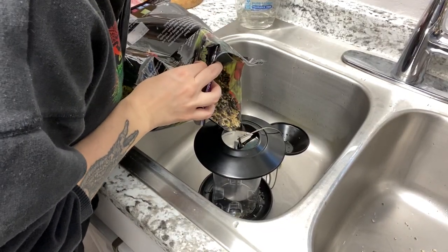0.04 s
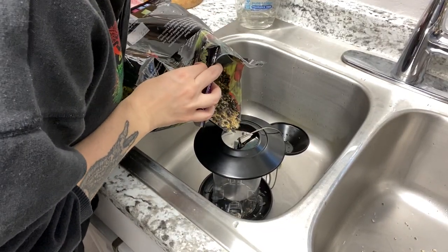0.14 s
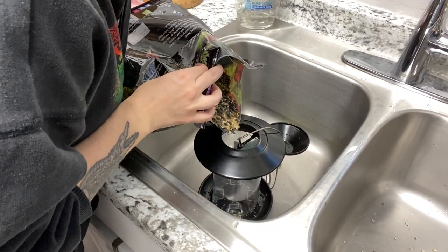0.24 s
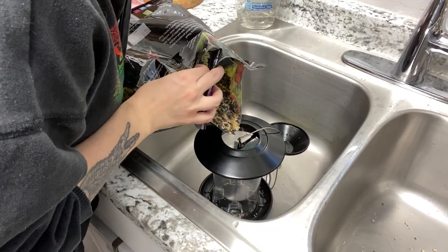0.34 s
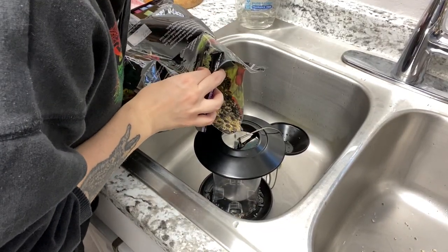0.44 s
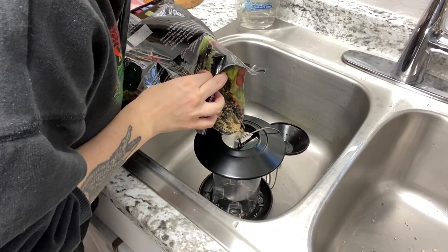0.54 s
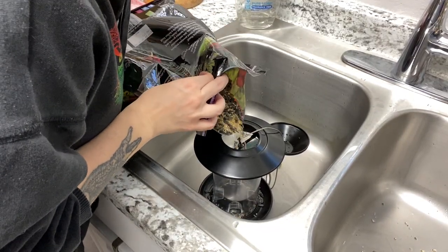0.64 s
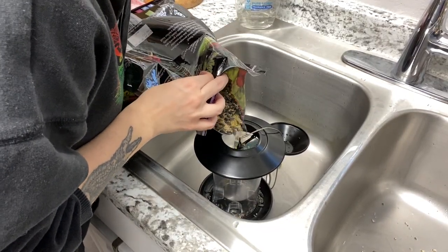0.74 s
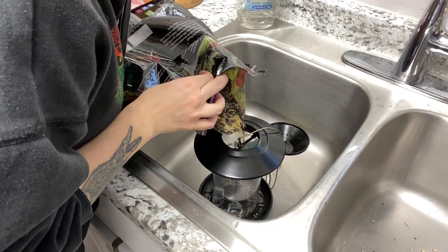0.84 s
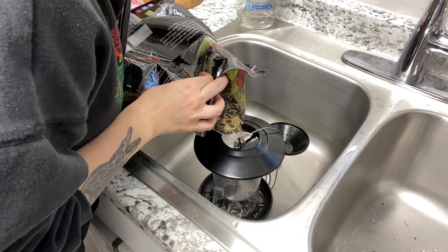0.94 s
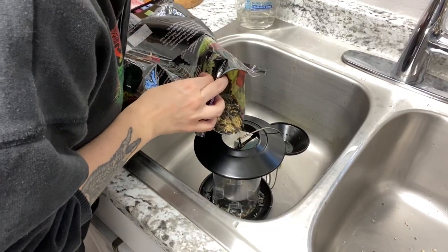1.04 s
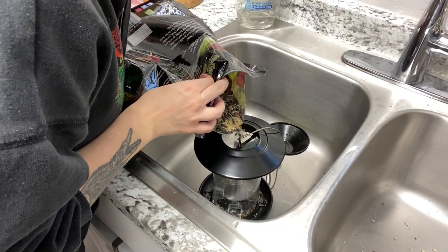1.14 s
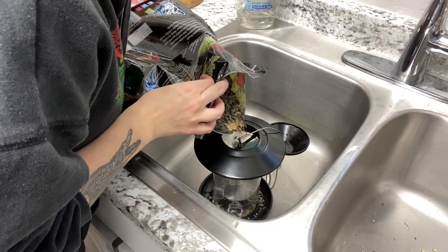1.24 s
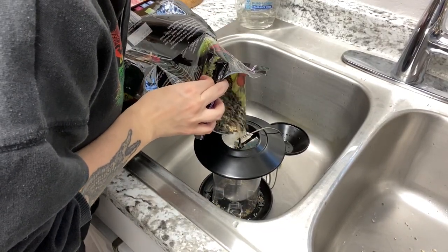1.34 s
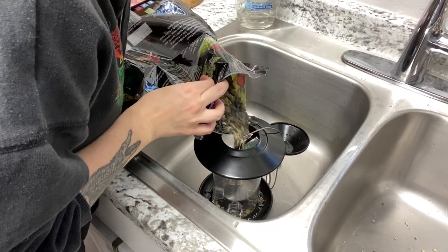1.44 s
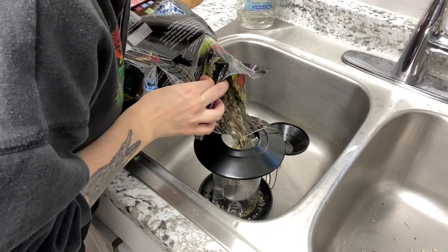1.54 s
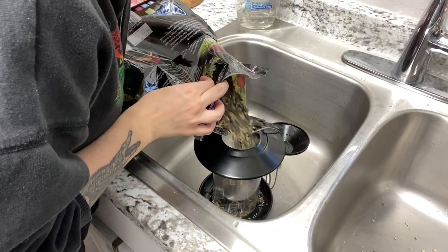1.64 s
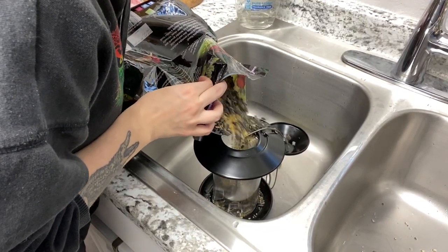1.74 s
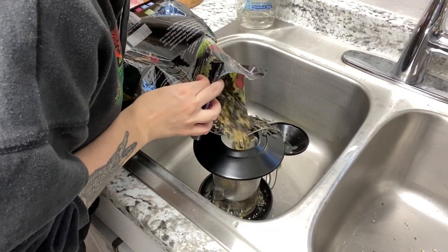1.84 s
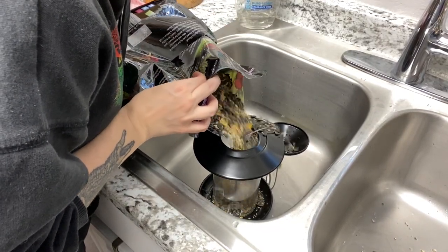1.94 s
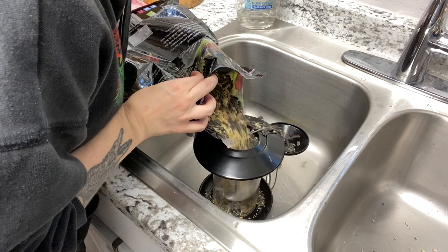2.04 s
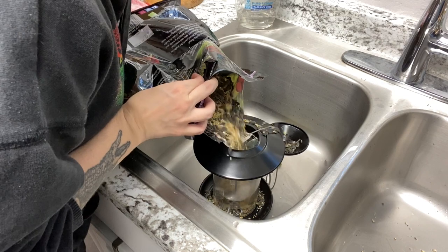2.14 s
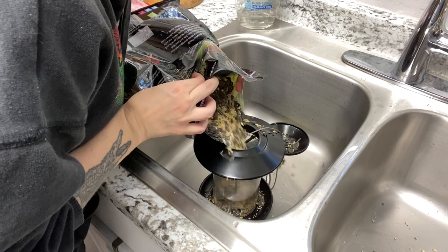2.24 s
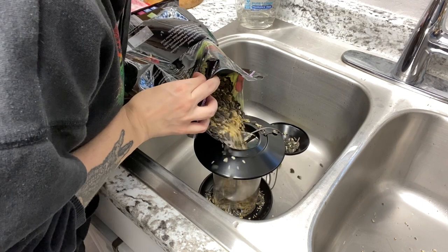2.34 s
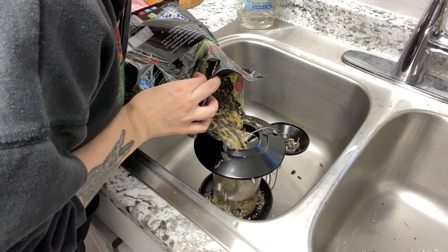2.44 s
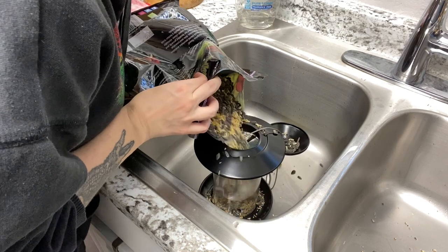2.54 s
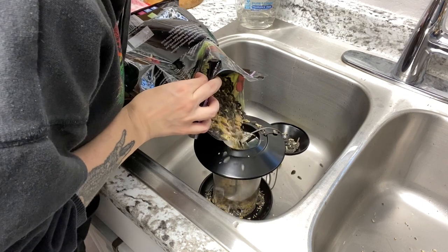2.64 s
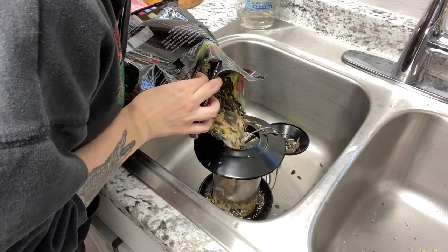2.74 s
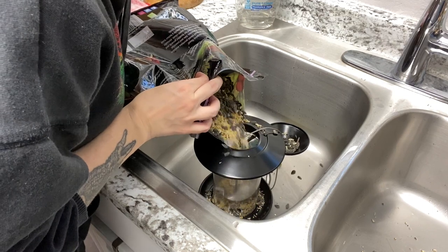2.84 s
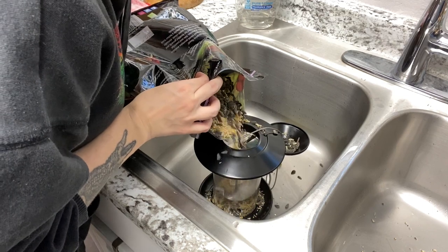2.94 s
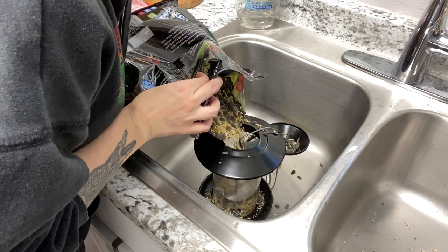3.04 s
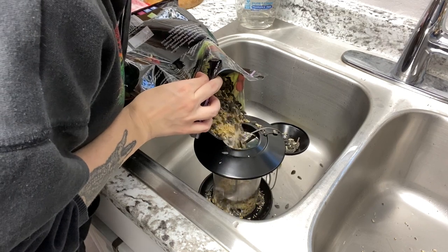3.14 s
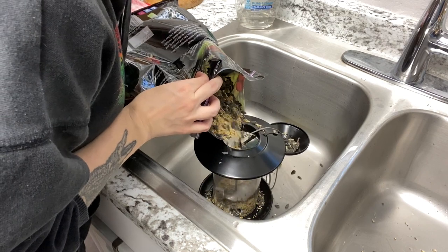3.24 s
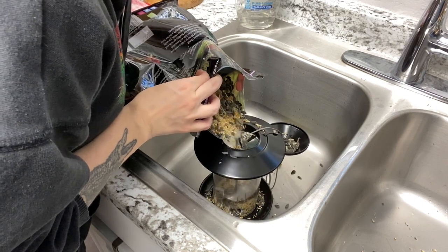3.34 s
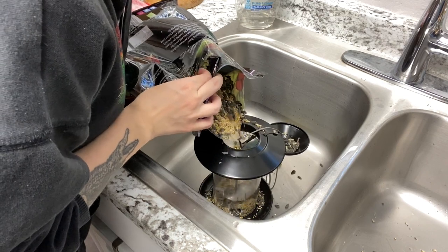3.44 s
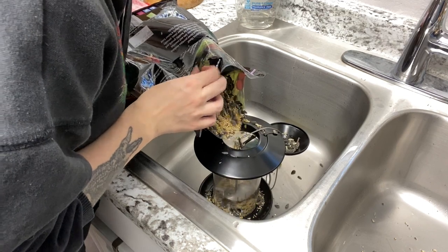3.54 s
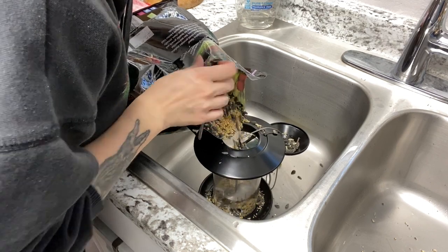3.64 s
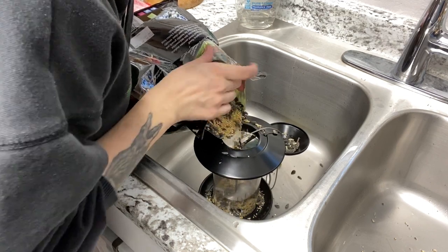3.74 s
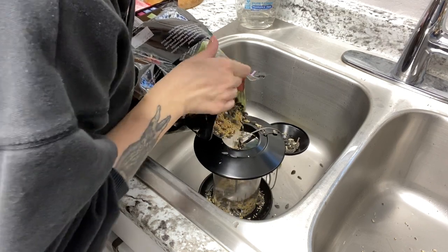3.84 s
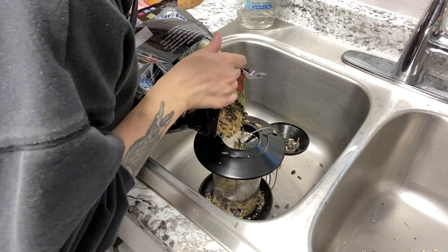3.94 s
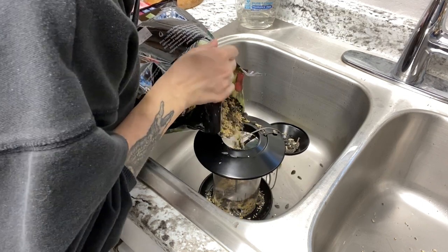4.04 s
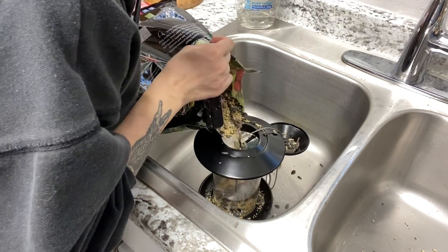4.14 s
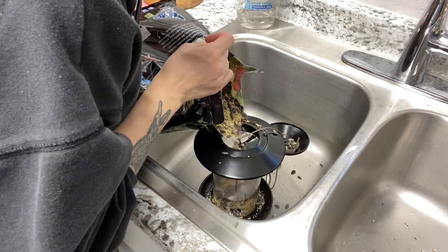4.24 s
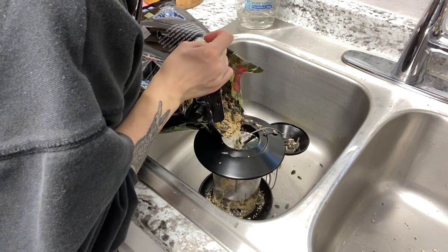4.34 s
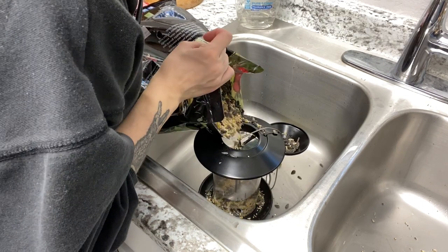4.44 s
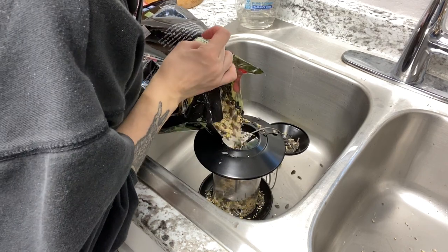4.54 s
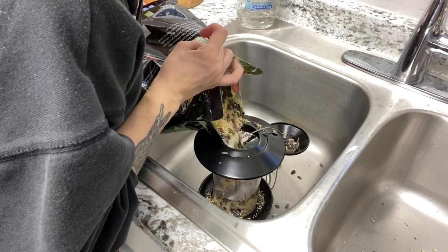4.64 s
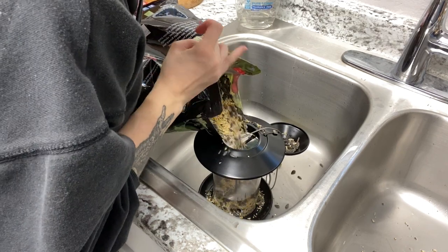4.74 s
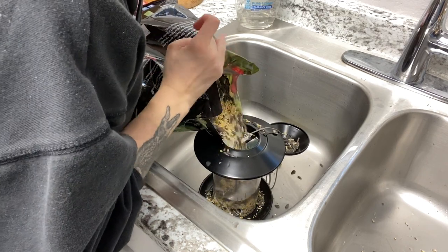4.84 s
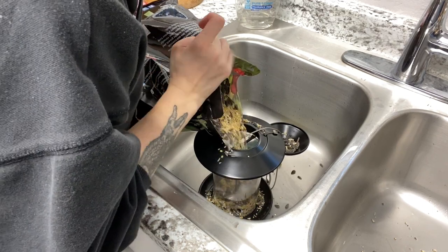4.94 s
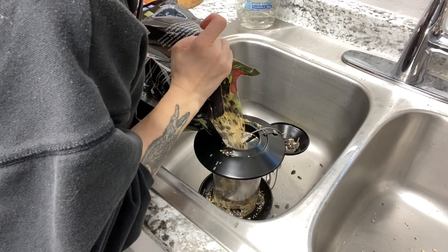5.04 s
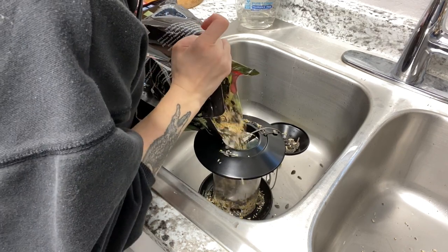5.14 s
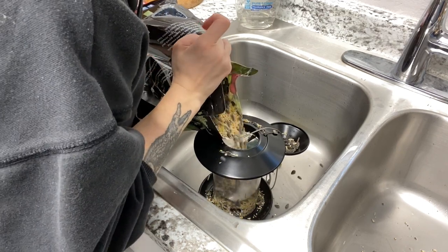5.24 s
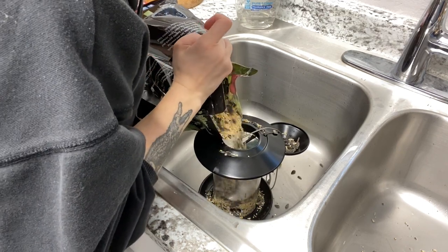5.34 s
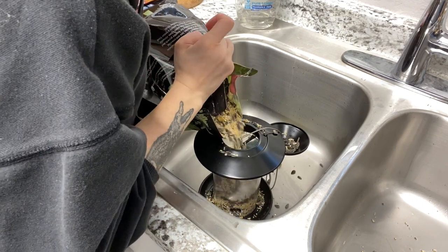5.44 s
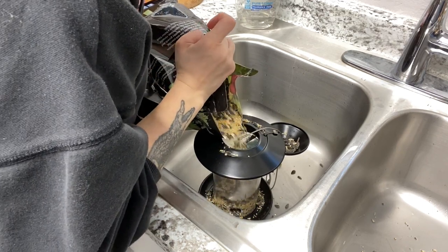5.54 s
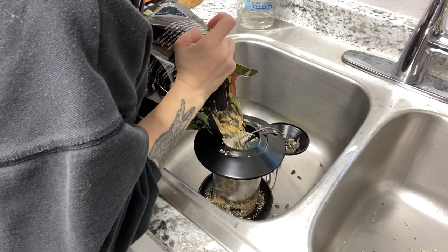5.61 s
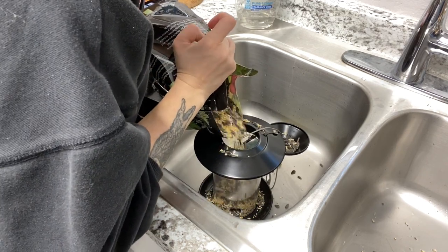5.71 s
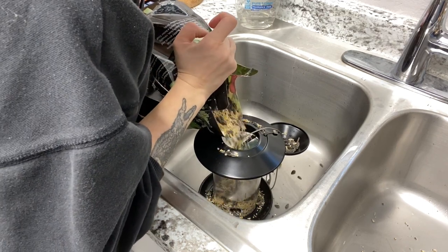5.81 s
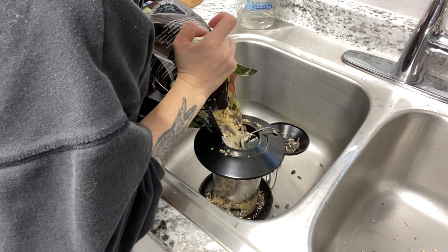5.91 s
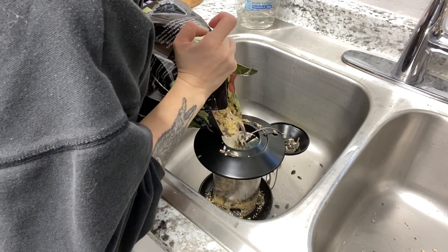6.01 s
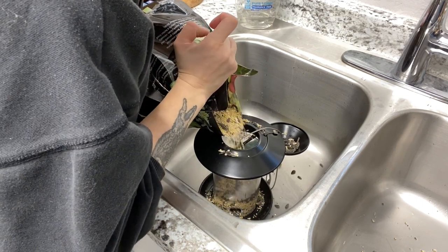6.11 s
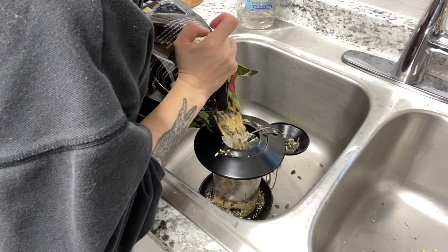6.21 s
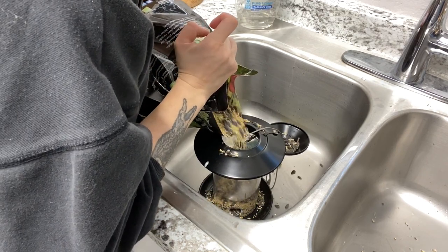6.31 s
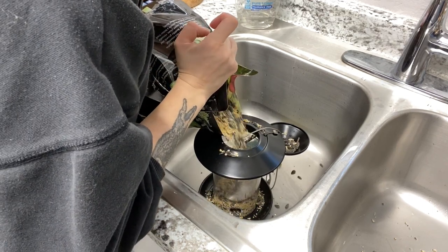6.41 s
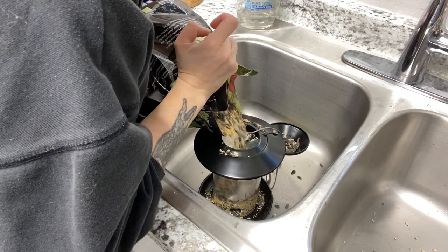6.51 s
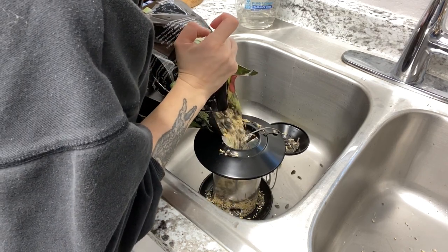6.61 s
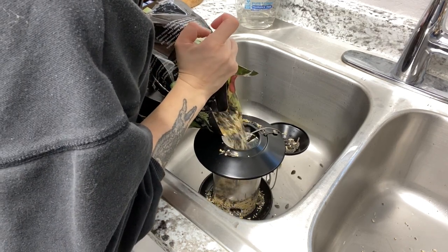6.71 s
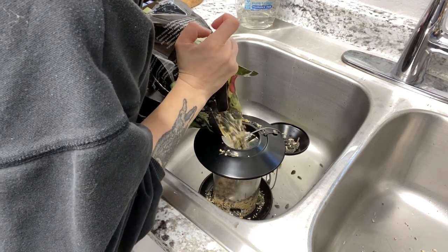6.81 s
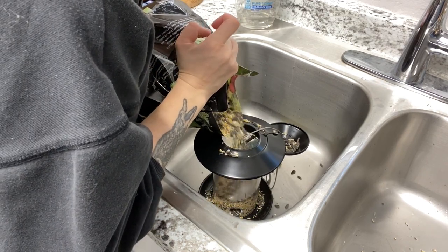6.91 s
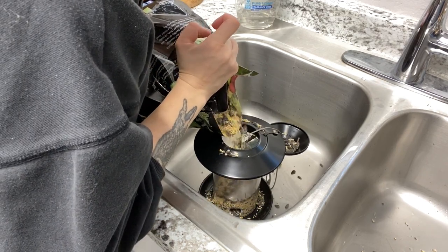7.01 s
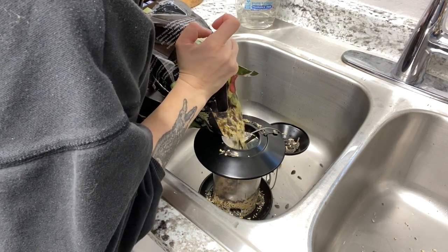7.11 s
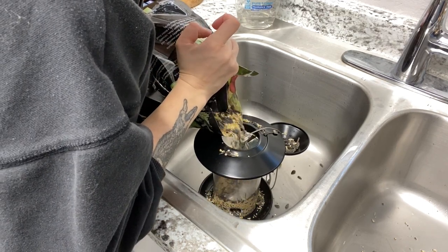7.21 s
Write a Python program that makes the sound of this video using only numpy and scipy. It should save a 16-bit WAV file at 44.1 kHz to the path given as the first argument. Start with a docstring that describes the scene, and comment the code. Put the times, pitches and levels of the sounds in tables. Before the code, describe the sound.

Close stereo pickup at a kitchen sink: bird seed trickles, nearly pauses, then rushes from a plastic bag into a tube feeder. Grains hiss and tick, the metal roof rings, and strays ping on steel. The patter thins and dulls as the tube fills; the bag thumps and crackles in the hands around four seconds, then a softer pour resumes. Faint traffic hums beyond the walls.

```python
"""Seed poured into a tube feeder

Bird seed pours from a plastic bag into a tube feeder that stands in a steel sink. Dense random impacts form
the bright patter, excite the modes of the metal roof and blow the air column of the tube into a tone.
Heavy seeds tick singly, strays ring and the bag thumps in the hands: noise bursts, decaying tones and hollows.
Traffic drones beyond the walls as tones and shaped noise; two microphone ports hear it with a phase offset."""
import sys
import numpy as np
from scipy import signal
from scipy.fft import rfft, irfft, next_fast_len
from scipy.io import wavfile

SR = 44100
rng = np.random.default_rng(int(sys.argv[2]) if len(sys.argv) > 2 else 0)


def to_wav(sig):
    """Store sig (one row per channel, or 1-D mono) as 16-bit WAV at the path in sys.argv[1].

    Samples outside -1..1 are clipped; the rate is SR.
    """
    pcm = np.clip(np.atleast_2d(sig), -1, 1) * 32767
    pcm = np.round(pcm).astype(np.int16)
    wavfile.write(sys.argv[1], SR, pcm.T)  # frames by channels


N = 320607
PADDED = next_fast_len(N + 4000)   # FFT length in samples
TIME_S = np.arange(N) / SR

# Heavy seeds landing. Each row: start in seconds, relative level of the bright burst in dB,
# middle part against the bright level in dB, knock on the roof against the bright level in dB.
HEAVY_SEEDS = [(0.0179, -12.5, -26, -36), (0.064, -23, -19, 1), (0.122, -12, -4, -31),
               (0.195, -20, -20, -34), (0.25, -15.5, -12, -34), (0.308, -11.5, -16.5, -20),
               (0.3281, -31, -12, -6), (0.38, -22.5, -11, -26), (0.446, -29.5, 1, -21),
               (0.467, -21, -13, -13.5), (0.501, -28, 1, -13), (0.602, -26, -3.5, -12),
               (0.6862, -13, -17, -42), (0.698, -10, -28, -25), (0.7516, -17, -20, -32),
               (0.787, -10.5, -12, -38), (0.84, -15, -5, -29), (0.884, -11, -8, -38),
               (0.934, -18.5, -16, -25), (0.968, -14, -11, -26), (1.0545, -11, -13.5, -29),
               (1.1233, -11, -26, -20.5), (1.1496, -13.5, -7, -15.5), (1.1754, -12.5, -24, -26),
               (1.258, -16.5, -9, -34), (1.3263, -17, -15, -24), (1.371, -17, -7, -10.5),
               (1.3902, -19, -8, -18), (1.4082, -19, -11, -4), (1.4496, -18, -5, -14),
               (1.471, -18, -8, -26), (1.5151, -18, -2, -8), (1.6227, -9, -26, -17), (1.674, -11, -27, -26),
               (1.7375, -14, -18, -31), (1.82, -28, -6, -14), (1.8725, -13, -13, -20),
               (1.922, -23, -18, -6), (2.026, -13, -25, -33), (2.0603, -17, -25, -36),
               (2.137, -13, -8, -25), (2.1815, -18, -25, -5), (2.373, -21, -7, -12), (2.4628, -34, 10, -25),
               (2.4954, -17, -13, -15.5), (2.5242, -15, -12, -35), (2.5443, -20, -4, -11),
               (2.6098, -23, -16, -33), (2.707, -24, -7, -34), (2.8197, -44, -3, -25),
               (2.9224, -23, -7.5, -33), (2.9472, -19, -14, -16), (2.9828, -22, -7, -13),
               (3.0898, -27, -8, -21), (3.142, -24, -12, -8), (3.19, -21, -10, -36),
               (3.236, -19.5, -11, -36), (3.268, -33, 0, -32), (3.4099, -43, 0, -25), (3.439, -24, -6, -12),
               (3.474, -29, -2, -8), (3.5008, -21, -12, -15), (3.5832, -19.5, -25, -15.5),
               (3.6126, -19.5, -7.5, -33), (3.683, -10.5, -12, -23), (3.7736, -27, -1, -20),
               (3.8272, -22.5, -12, -18), (3.8479, -28, 5, -1), (3.899, -26, -10, -17),
               (3.923, -22.5, -7, -12), (4.047, -22, -11, -6.5), (4.1591, -17.5, -12, -9),
               (4.2712, -24, -4.5, -19), (4.31, -11, -10, -15), (4.345, -16.5, -17, -14),
               (4.385, -24, -3, -20), (4.4528, -13.5, -17, 2), (4.461, -20, -10, -3), (4.511, -21, -4, -20),
               (4.66, -19.5, -11, -35), (4.699, -25, -10, -30), (4.766, -27, -5, -30),
               (4.9872, -19, -9, -5), (5.0665, -12.5, -14, -37), (5.09, -18, -8, -18),
               (5.126, -31, -2, -25), (5.144, -23, -7, -24), (5.2612, -20, -9, -26), (5.3074, -23, -7, -19),
               (5.4347, -23.5, -9, -24), (5.463, -39, -6, -25), (5.5057, -20.5, -15, -30),
               (5.5782, -36, -0.5, -25), (5.65, -23.5, -9, -24), (5.675, -25, -7, -27),
               (5.724, -35.5, 9, -25), (5.7896, -29, -7, -27), (5.8154, -29, -5, -27),
               (5.8381, -50, -7, -27), (5.886, -36, -15, -33), (5.918, -36, -17, -25),
               (5.954, -30, -7, -27), (6.0204, -32.5, 0, -27), (6.04, -24, -6.5, -27),
               (6.116, -19.5, -17, -20), (6.129, -27, -16, -1), (6.143, -28, -9, -27),
               (6.179, -30, -6, -27), (6.2093, -20, -18, -8), (6.248, -23, -12, -4), (6.293, -23, -9, -41),
               (6.364, -19, -10, -29), (6.4043, -32, -17, -27), (6.433, -25, -11, -27),
               (6.4585, -23, -14, -29), (6.496, -19, -11, -28), (6.5233, -18, -10, -29),
               (6.565, -20, -21, -27), (6.624, -16.5, -14, -30), (6.682, -14.5, -19, -8.5),
               (6.727, -21, -4, -23), (6.8056, -33.5, 7, -19), (6.8503, -30, 0, -27),
               (7.2555, -29, -9, -27)]
# The bag buckling in the hands. Each row: start in seconds, relative level in dB, pitch of the fold in Hz,
# snap against that level in dB, rise in seconds.
BUCKLES = [(0.008, -40, 820, -9, 0.0014), (0.179, -36.5, 412, -13, 0.0016), (0.394, -28, 353, -20, 0.0026),
           (0.687, -39, 373, -9, 0.0016), (1.052, -37.5, 395, -6.5, 0.00096),
           (1.346, -33.5, 382, -13, 0.0017), (2.21, -34.5, 590, -13, 0.0019),
           (2.219, -36.5, 333, -7.5, 0.003), (3.789, -24.5, 480, -10, 0.00095),
           (3.932, -31, 760, -13, 0.0022), (3.962, -29, 590, -3, 0.00078), (4.073, -33, 430, -11, 0.0046),
           (4.121, -38, 560, -26, 0.016), (4.139, -39, 330, -22, 0.004), (4.164, -40, 470, -8, 0.007),
           (4.177, -40, 590, -12, .004), (4.188, -42, 520, -8, 0.0048), (4.222, -40, 695, -6, 0.0042),
           (4.234, -42, 990, -7, 0.004), (4.286, -36.5, 790, -12, 0.0022), (4.296, -34, 850, -9, 0.0017),
           (4.337, -24.5, 443, 3, 0.00052), (4.346, -20.5, 398, -2, 0.0016), (4.364, -33, 330, -18, 0.0047),
           (4.391, -34.5, 363, -0.5, 0.0047), (4.421, -32.5, 725, -4, 0.0021), (4.446, -32, 363, 7, 0.0088),
           (4.463, -35, 420, 1, .003), (4.488, -42, 324, 3, 0.0055), (4.51, -52, 495, -1, 0.0044),
           (4.629, -30, 795, -9, 0.00036), (4.719, -35, 910, -6, .002), (4.728, -20.5, 840, -6, 0.0013),
           (4.83, -40, 584, -1, 0.0025), (4.898, -42.5, 304, 5, 0.00077), (5.174, -38.5, 593, -13, 0.0037),
           (5.213, -39.5, 322, -2, 0.0048), (5.224, -44, 520, 7.5, 0.0068), (5.326, -28, 560, -5, 0.0015),
           (5.492, -45, 890, -6, 0.0018), (5.724, -30, 1530, -6.5, 0.0014), (5.731, -37, 600, -15, .001),
           (6.199, -47, 506, 9, 0.0059)]
# Colour of a seed impact. Each row: frequency in Hz, relative spectral level in dB.
SEED_COLOUR = [(400, -30), (1200, -18), (2200, -11), (2850, -14), (3300, -8.5), (4000, -6), (5200, -5),
               (6200, 0), (7000, -4), (8000, -3), (9500, -2.5), (12000, -2.5), (13500, -7), (15700, -5)]


def amp(db):
    """Decibels to gain: twenty decibels are a factor of ten in amplitude."""
    return 10 ** (np.asarray(db) / 20)


def rms_one(x):
    """Normalisation of a signal to unit root mean square."""
    return x / np.sqrt(np.mean(x ** 2) + 1e-20)


def in_time(rows):
    """Linear interpolation of a table's columns over time, one value a sample."""
    s, *columns = np.transpose(rows)
    return [np.interp(TIME_S, s, c) for c in columns]


def in_hz(rows):
    """Interpolation of a table's columns over log frequency, one value an FFT bin."""
    hz, *columns = np.transpose(rows)
    grid = np.log(np.arange(PADDED // 2 + 1) * SR / PADDED + 1)
    return [np.interp(grid, np.log(hz), c) for c in columns]


def coloured(x, spectrum):
    """Linear filtering: the spectrum is multiplied by the gain curve of a table."""
    return irfft(rfft(x, PADDED) * amp(in_hz(spectrum)[0]), PADDED)[..., :N]


def drift(rate_hz):
    """Slow random fluctuation of unit rms: noise through a double-pole low-pass, computed at every 40th sample."""
    r = np.exp(-2 * np.pi * rate_hz * 40 / SR)
    noise = rng.standard_normal(N // 40 + 2002)
    slow = signal.lfilter([1], [1, -2 * r, r * r], noise)[2000:]   # the settling is dropped
    return np.interp(np.arange(N) / 40, np.arange(len(slow)), rms_one(slow))


def resonate(x, hz, width_hz):
    """Damped resonance: one pole pair whose bandwidth sets the decay, with gain near 1 at the peak."""
    r = np.exp(-np.pi * width_hz / SR)
    poles = [1, -2 * r * np.cos(2 * np.pi * hz / SR), r * r]
    return signal.lfilter([(1 - r * r) / 2, 0, (r * r - 1) / 2], poles, x)


def narrow(white, hz, width_hz):
    """Narrow-band noise: two equal resonances in series make a wavering tone of unit rms."""
    return rms_one(resonate(resonate(white, hz, width_hz), hz, width_hz))


def scatter(per_s, size_db, t60):
    """Shot noise: random impacts die exponentially in power round the basin; two paths of unrelated noise."""
    hits = rng.random(N) < per_s / SR
    power = hits * amp(2 * size_db * np.minimum(rng.exponential(1, N), 4))
    r = amp(-120 / (t60 * SR))
    envelope = np.sqrt(signal.lfilter([1], [1, -r], power + 1e-18))
    return envelope * rng.standard_normal((2, N))


def silence():
    """Two almost empty paths: a trace of noise avoids denormal numbers, so that filters stay fast."""
    return 1e-12 * rng.standard_normal((2, N))


def add(out, s, burst):
    """Superposition of a burst that starts at time s."""
    i = round(s * SR)
    out[:, i:i + burst.shape[1]] += burst[:, :N - i]


def patter(flow_db):
    """Superposed seed impacts: clumped fine grains, crisp small ticks, sparser large ones and resonant pings."""
    dull_hz, dull_db_per_s, patchy_db = 8900, 0.5, 1.5
    fine = rms_one(scatter(2000 * amp(3 * drift(18)), size_db=3, t60=0.025))
    crisp = rms_one(scatter(300 * amp(3 * drift(7.3)), size_db=2.8, t60=0.03))
    large = rms_one(scatter(110, size_db=-9, t60=0.12))
    ringing = rms_one(pings(700, quality=60))
    seeds = fine + amp(-1) * crisp + amp(-5) * large + amp(-5) * ringing
    seeds = rms_one(coloured(patchy(seeds, patchy_db), SEED_COLOUR))
    # the treble fades as seed lands on seed
    treble = coloured(seeds, [(dull_hz / 1.3, -40), (dull_hz, 0)])
    treble_change = amp(-dull_db_per_s * TIME_S) - 1
    return amp(flow_db + 4) * (seeds + treble_change * treble)


def pings(per_s, quality):
    """Free vibration of struck seeds: each impact excites one of twelve resonances of equal quality factor."""
    hits = rng.random(N) < per_s / SR
    sizes = hits * amp(3 * np.minimum(rng.exponential(1, N), 3)) * rng.choice([-1, 1], (2, N))
    dealt, hush = rng.integers(0, 12, N), silence()
    pitches = np.geomspace(2600, 14000, 12)
    return sum(resonate(sizes * (dealt == k) + hush, hz, hz / quality) for k, hz in enumerate(pitches))


def patchy(x, swing_db):
    """Band-wise amplitude modulation: seeds of one size come together, so each band flickers on its own."""
    spectrum, hz = rfft(x, PADDED), np.arange(PADDED // 2 + 1) * SR / PADDED
    band = np.digitize(hz, np.geomspace(1500, 13000, 12))
    out = 0
    for k in range(13):
        flicker = amp(swing_db * drift(25))
        out = out + flicker * irfft(spectrum * (band == k), PADDED)[:, :N]
    return out


def roof(stream_db, heavy):
    """Modal excitation: stream and heavy seeds drive the modes of roof and tube unevenly, over a dull clatter."""
    # Each row: mode frequency in Hz, bandwidth in Hz, relative level in dB.
    roof_modes = [(797, 16, -10), (1260, 25, -12), (1480, 36, -3), (1680, 35, -3), (1756, 22, -3),
                  (1905, 25, 1), (2026, 22, -2), (2290, 40, 4), (2560, 70, 0), (3140, 70, 0),
                  (3640, 80, -3), (3990, 55, -1), (4520, 60, -3), (5065, 50, -2), (5550, 50, -1),
                  (6040, 90, 0), (7164, 30, 4), (7596, 40, 2), (7815, 35, 1)]
    # The filling tube damps the ring. Each row: time in seconds, relative level of the ring in dB.
    ring_level = [(0, 2), (2.6, 2), (3.7, -3), (4.0, -12), (7.27, -14)]
    stream = rms_one(scatter(300, size_db=0.5, t60=0.064))
    blows = amp(stream_db) * stream + amp(1) * heavy
    ring = 0
    for k, (hz, width_hz, level_db) in enumerate(roof_modes):
        uneven_db = 1.8 * drift(8)
        ring = ring + (-1) ** k * amp(level_db + uneven_db) * resonate(blows, hz, width_hz)
    clatter = resonate(resonate(blows, 2000, 1400), 2000, 1400)
    return amp(in_time(ring_level)[0] + 16.5) * ring + clatter


def strikes():
    """Impact excitation: exponentially decaying noise where heavy seeds and the bag knock on the roof."""
    knock_t60_s, seed_db, bag_db = 0.22, -7.5, 2
    out, t = silence(), np.arange(6000) / SR
    blows = [(s, db + knock + seed_db) for s, db, _, knock in HEAVY_SEEDS]
    blows += [(s, db + snap + bag_db) for s, db, _, snap, _ in BUCKLES]
    for s, level_db in blows:
        add(out, s, rng.standard_normal((2, len(t))) * amp(level_db - 60 * t / knock_t60_s))
    return out


def tube(flow_db):
    """Turbulent excitation of an air column: the stream blows a narrow wavering tone until the tube has filled."""
    full_s, swell_s, swell_length_s, swell_db = 3.8, 2.125, 0.12, 11
    level_db = -57 + 0.69 * (flow_db + 38.5) + 2 * drift(3.2)   # follows a share of the flow's swing
    level_db -= 3 * np.maximum(TIME_S - swell_s, 0)   # sinks by 3 dB a second after the swell
    level_db += swell_db * np.exp(-(2 * (TIME_S - swell_s) / swell_length_s) ** 2)   # swells once
    not_full = np.clip((full_s - TIME_S) / 0.1, 0, 1)
    return not_full * amp(level_db) * narrow(rng.standard_normal((2, N)), 864, 22)


def ticks():
    """Two-stage decay of single impacts: a sharp bright burst with a longer middle part."""
    rise_s, hold_s = 0.0016, 0.001
    bright, middle, t = silence(), silence(), np.arange(4400) / SR
    rise = np.clip(t / rise_s, 0, 1)
    after = np.maximum(t - rise_s - hold_s, 0)
    # a fast decay and a weaker slow one in each part
    short = rise * (amp(-60 * after / 0.065) + amp(-16.5 - 60 * t / 0.32))
    long = rise * (amp(-60 * after / 0.07) + amp(-9 - 60 * t / 0.35))
    for s, bright_db, middle_db, _ in HEAVY_SEEDS:
        noise = rng.standard_normal((2, len(t))) * amp(bright_db)
        add(bright, s, noise * short)
        add(middle, s, noise * long * amp(middle_db))
    high_pass = signal.butter(4, 7000, "high", fs=SR, output="sos")
    treble = signal.sosfilt(high_pass, coloured(bright, SEED_COLOUR))
    return amp(-0.5) * treble + amp(-1) * resonate(middle, 4120, 2600)


def strays():
    """Beating: stray seeds ring tones on metal whose level pulses, as with two close modes, and dies away."""
    # Each row: start in seconds, level before the beating in dB, pitch in Hz, 60 dB decay time in seconds.
    stray_rings = [(0.327, -28, 2300, 0.27), (2.184, -24.5, 2280, .12), (.384, -40.5, 7150, 0.23),
                   (0.467, -26, 6120, 0.037), (0.7, -28.5, 7240, 0.11), (.80, -25, 5080, 0.13),
                   (1.054, -35, 7600, 0.15), (1.26, -28.5, 5020, 0.068), (1.327, -31, 7600, 0.17),
                   (1.35, -28, 6000, 0.084), (1.391, -21.5, 2290, 0.27), (1.47, -39, 7600, .15),
                   (1.514, -33, 5530, 0.16), (1.62, -24.5, 7170, .1), (1.738, -36, 6050, 0.13),
                   (2.955, -38, 5470, 0.61), (2.952, -38, 2290, 0.17), (2.975, -34, 2273, .15),
                   (2.955, -37, 6550, 0.2), (2.98, -33, 8050, .15), (3.239, -37, 5420, 0.47),
                   (3.236, -32, 6600, 0.31)]
    out, t = silence(), np.arange(9000) / SR
    for s, level_db, hz, t60 in stray_rings:
        turn = 2 * np.pi * hz * t + rng.uniform(0, 2 * np.pi, (2, 1))
        envelope = amp(level_db - 60 * t / t60) * np.minimum(t / 0.00055, 1)
        beat = 1 + 0.47 * np.sin(2 * np.pi * rng.uniform(16, 63) * t)
        add(out, s, envelope * beat * np.sin(turn))
    return out


def thumps():
    """Buckling of film: crackly snaps, a tap gliding down to the pitch of the fold, and cavity resonances."""
    # Hollows of the bag. Each row: frequency in Hz, bandwidth in Hz, relative level in dB.
    bag_hollows = [(243, 39, -2.5), (363, 31, 1.5), (438, 59, -3), (560, 73, -9), (664, 37, -7.5),
                   (859, 49, -7.5), (1040, 680, -11)]
    fold_cycles = 20   # the fold's 60 dB decay, in cycles of its pitch
    glide, glide_s = 0.61, 0.0016   # the pitch starts higher by this share; time constant of its drop
    snaps, folds, hollows, t = silence(), silence(), silence(), np.arange(8000) / SR
    for s, level_db, hz, snap_db, rise_s in BUCKLES:
        rise = np.minimum(t / rise_s, 1)
        after = np.maximum(t - rise_s, 0)
        noise = rng.standard_normal((2, len(t))) * amp(level_db) * rise
        # the film gives way in separate small cracks, with one sharp crack on top of the rise
        creases = (rng.random(len(t)) < 0.012) * amp(rng.normal(-1.4, 4.9, len(t)))
        creases[(t > rise_s - 0.0005) & (t < rise_s + 0.0005)] = amp(-2)
        add(snaps, s, noise * creases * amp(snap_db - 60 * after / 0.16))

        pitch = hz * (1 + glide * np.exp(-t / glide_s))
        turn = 2 * np.pi * np.cumsum(pitch) / SR + rng.uniform(0, 2 * np.pi)
        tap = amp(level_db - 60 * after * hz / fold_cycles) * rise * np.sin(turn)
        add(folds, s, tap * [[1], [0]])   # first path only

        # a short push and a weaker, longer crinkle strike the hollows unevenly
        push = noise * (amp(-60 * after / 0.023) + amp(-14 - 60 * after / 0.32))
        body = resonate(push, hz, hz)
        for hollow_hz, width_hz, db in bag_hollows:
            add(hollows, s, amp(db + rng.normal(0, 2.5)) * resonate(body, hollow_hz, width_hz))
    snap = amp(19.5) * resonate(snaps, 1560, 2060) + amp(7) * resonate(snaps, 1570, 500)
    return snap + amp(-0.5) * folds + amp(19) * hollows


def outside():
    """Superposition of tonal and broadband noise: engine, hums, drones, swelling notes, rumble and room air."""
    # Hums and steady traffic drones, all as wavering narrow tones. Each row: frequency in Hz, bandwidth in Hz,
    # rms level in dB.
    hums, drones = [(308, 18.5, -66.5), (549, 86, -65.5)], [(61.2, 18, -54), (97.2, 6.4, -56), (227, 5.5, -62)]
    # Notes of passing traffic that swell and fade.
    # Each row: middle in seconds, length in seconds, pitch in Hz, rms level at the middle in dB.
    swells = [(1.302, 0.62, 97.7, -53), (2.488, 0.9, 227, -57.5), (2.805, 1, 193, -63),
              (3.734, 1, 227, -54), (4.266, 0.16, 101, -51), (4.746, 0.32, 66, -62),
              (5.645, 0.82, 97.2, -49), (5.652, 0.99, 132.6, -56), (5.806, 0.34, 227, -61),
              (6.457, 0.49, 96.4, -48.5), (6.56, 0.39, 63.25, -43), (7.15, 0.89, 63.9, -53)]
    # Broad road rumble. Each row: time in seconds, relative level in dB.
    road_level = [(0, -48.5), (1.0, -50.5), (1.62, -44), (2.4, -50), (2.85, -41), (3.5, -49.5),
                  (4.3, -42.5), (5.65, -43.5), (6.3, -51.5), (6.55, -49.5), (7.27, -52)]
    # Colours of rumble and room air. Each row: frequency in Hz, relative spectral level in dB.
    rumble_colour, air_colour = [(15, -15), (26, 2.5), (33, -3), (42, -24), (60, -26), (80, 2.5),
                                 (125, 5.5), (180, -1.5), (260, -3.5), (350, -8), (500, -19.5)], [(200, -36), (400, 3.5), (750, 2.5), (1100, -5),
                                                 (2200, -39), (4000, -5)]
    white = rng.standard_normal((2, 2, N))
    out = engine() + sum(amp(db) * narrow(white[0], hz, width_hz) for hz, width_hz, db in hums + drones)
    wobble = 2 * np.pi * np.cumsum(4 * drift(2.23)) / SR   # pitch wanders by 4 Hz rms
    for s, length, hz, level_db in swells:
        envelope = np.exp(-(2 * (TIME_S - s) / length) ** 4)
        out += np.sqrt(2) * amp(level_db) * envelope * np.sin(2 * np.pi * hz * TIME_S + wobble)
    rumble = amp(in_time(road_level)[0] - 1.5) * rms_one(coloured(white[1], rumble_colour))
    air = amp(-49.5) * rms_one(coloured(white[0], air_colour))
    return out + rumble + air


def engine():
    """Harmonic tone: an engine's note with its octave, whose pitch climbs and then sags as it eases off."""
    # Swells of the note. Each row: start in seconds, length in seconds, rms level of the note in dB.
    pulls = [(.35, 0.37, -57), (0.795, 0.88, -47.5), (1.793, 0.3, -49.5), (2.292, 0.62, -44.5),
             (2.982, 0.19, -50)]
    start_hz, rise_hz_per_s, ease_s, sag_hz_per_s = 117.3, 9.5, 2.85, 69
    edge_s, octave_db = 0.17, -17   # length of the fades; octave against the note
    climb = rise_hz_per_s * np.minimum(TIME_S, ease_s)
    sag = sag_hz_per_s * np.clip(TIME_S - ease_s, 0, 1)
    gain = 0
    for s, length, db in pulls:
        inside = np.minimum(TIME_S - s, s + length - TIME_S)
        gain = gain + amp(db) * np.clip(inside / edge_s + 0.5, 0, 1)
    turn = 2 * np.pi * np.cumsum(start_hz + climb - sag) / SR
    return np.sqrt(2) * gain * (np.sin(turn) + amp(octave_db) * np.sin(2 * turn))


def ports(paths):
    """Partial coherence: the right port hears the first path shifted in phase, mixed with the second path."""
    # Each row: frequency in Hz, phase lead of the right port in radians, likeness from 0 to 1,
    # left against right in dB.
    port_pair = [(30, .3, .88, 1.5), (100, .2, .9, 1), (250, .4, .75, -.5), (700, 1.1, .6, -4),
                 (1500, 1.4, .55, -2.5), (2200, 3.0, .48, -1.2), (3000, 3.14, .6, -2), (3400, 4, .15, -2.5),
                 (4600, 3.3, .45, -.3), (5500, 5.4, .3, 0), (6200, 5.6, .65, 0), (7100, 6.4, .2, 1.5),
                 (7600, 4.4, .75, 0), (8500, 3.3, .95, 0), (9100, 3.14, .995, 0), (9600, 2.7, .95, 0),
                 (10200, 2, .85, 0), (12000, 0, .99, 0), (13600, -1.8, .75, 0), (14200, -2.8, .95, 0),
                 (14700, -3.14, .995, 0), (15100, -3.3, .95, 0), (15800, -4.1, .75, 0)]
    lead, alike, balance_db = in_hz(port_pair)
    first, second = rfft(paths, PADDED)
    right = np.exp(1j * lead) * (alike * first + np.sqrt(1 - alike ** 2) * second)
    return irfft([first * amp(balance_db / 2), right * amp(-balance_db / 2)], PADDED)[:, :N]


def scene():
    """Linear superposition of all sources, heard through the port pair."""
    # Flow of the pour. Each row: time in seconds, relative level in dB.
    pour_flow = [(0.0, -24), (0.28, -33.5), (0.44, -54), (0.64, -45), (0.72, -32.5), (0.95, -32),
                 (1.17, -39.5), (1.4, -34.5), (1.55, -32.5), (1.61, -27.5), (1.63, -28), (1.67, -25),
                 (1.74, -22), (1.88, -29.5), (2.06, -28), (2.2, -33), (2.73, -37.5), (3.1, -36),
                 (3.48, -41.5), (4.2, -43), (4.66, -41), (5.18, -35), (5.65, -40.5), (5.76, -43),
                 (5.92, -35.5), (6.0, -40), (6.12, -38), (6.36, -38), (6.6, -32.5), (7.05, -36.5),
                 (7.27, -40.5)]
    flow_db, = in_time(pour_flow)
    stream_db = flow_db - 7 - 1.63 * TIME_S   # blows soften, in dB a second, as seed lands on seed
    pour = patter(flow_db) + roof(stream_db, strikes()) + tube(flow_db)
    return ports(pour + ticks() + strays() + thumps() + outside())


def record(dry):
    """Band limitation: a steep low-pass is 60 dB down from 16.2 kHz upwards."""
    return signal.sosfilt(signal.cheby2(20, 60, 16200, fs=SR, output="sos"), dry)


dry = scene()
out = record(dry)
to_wav(out)
```